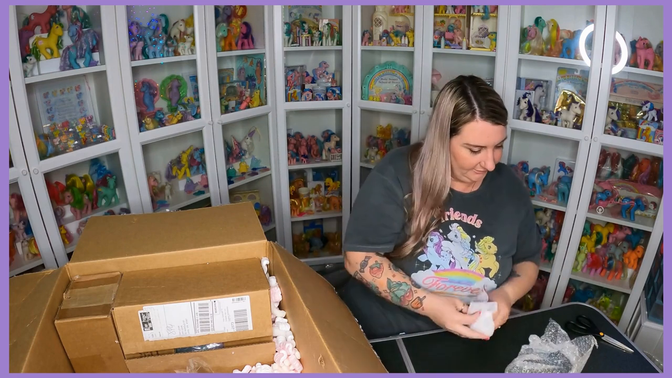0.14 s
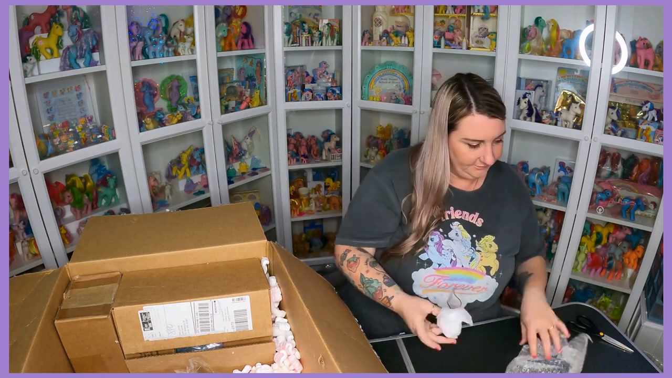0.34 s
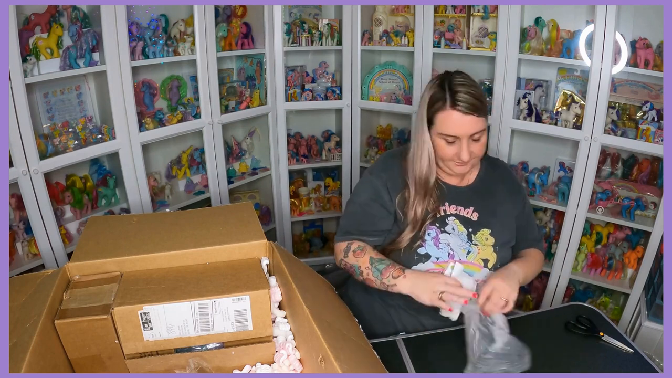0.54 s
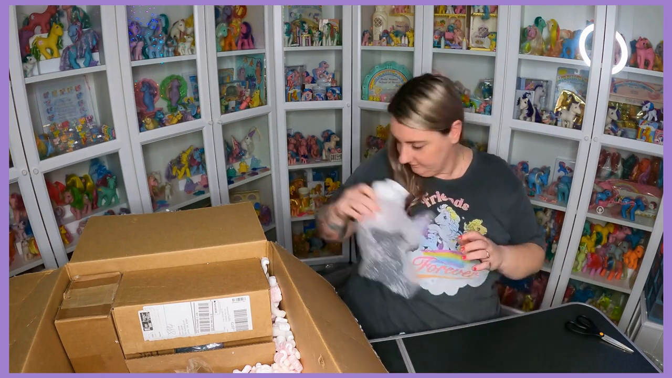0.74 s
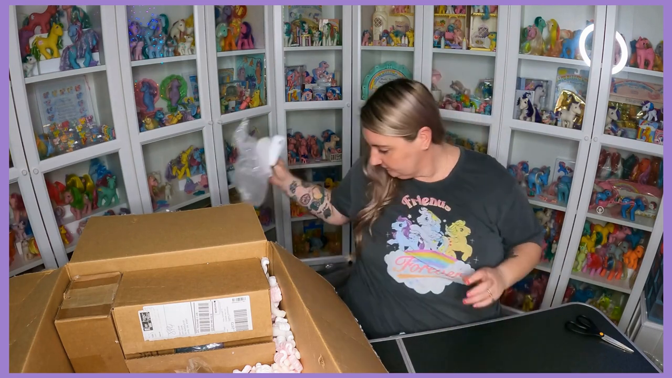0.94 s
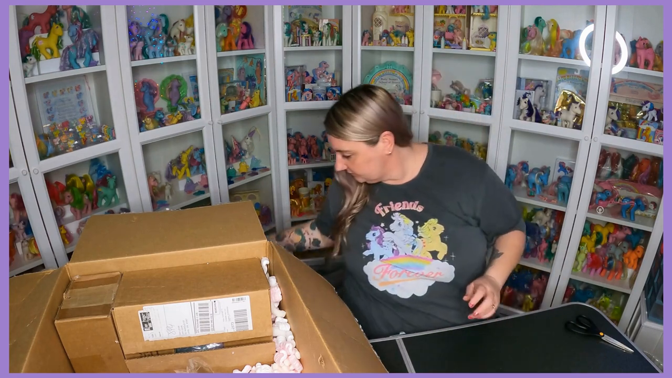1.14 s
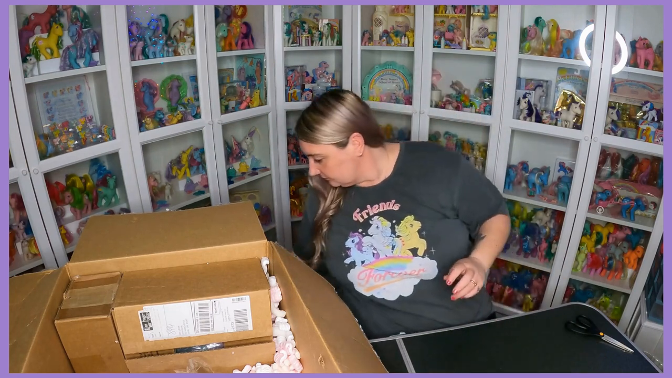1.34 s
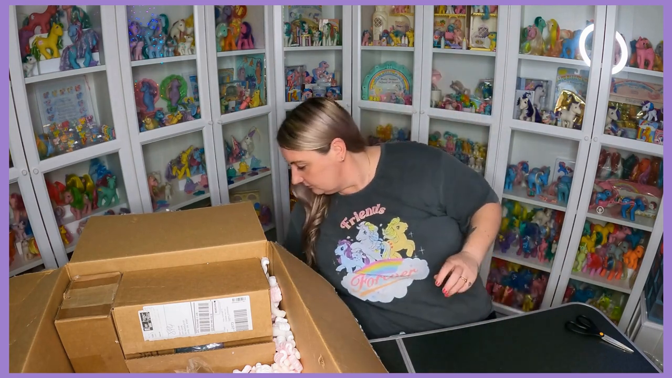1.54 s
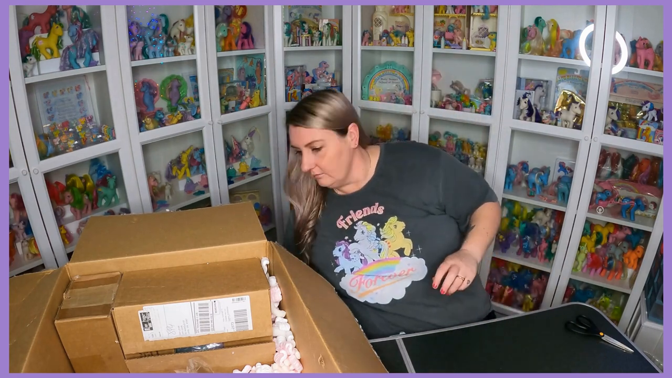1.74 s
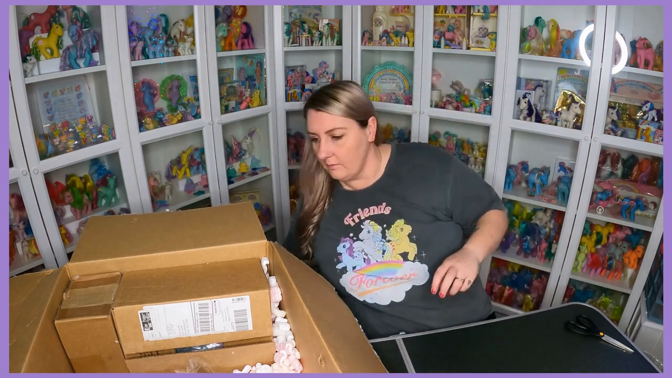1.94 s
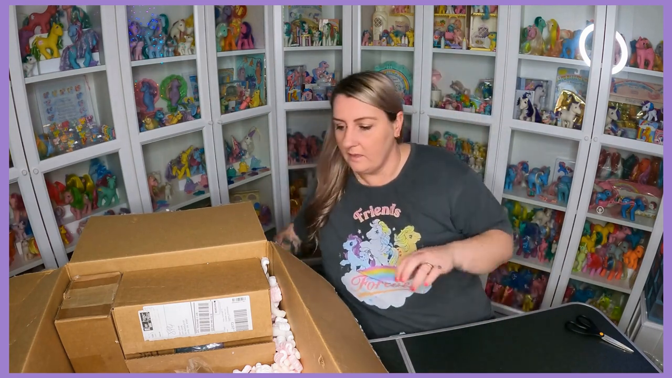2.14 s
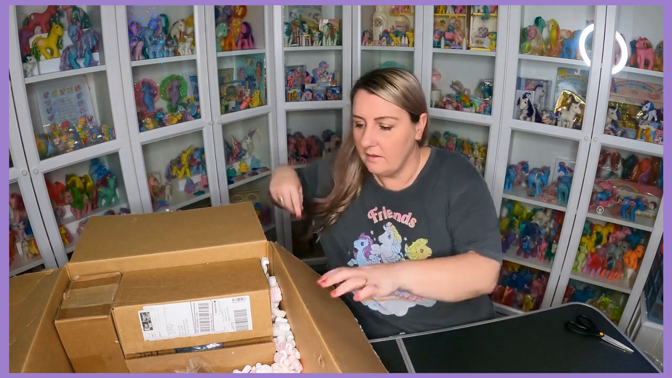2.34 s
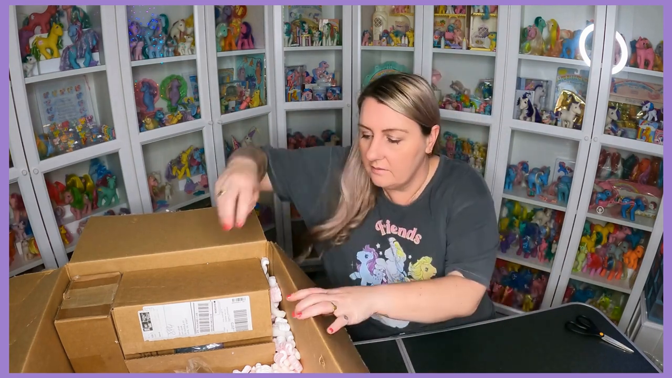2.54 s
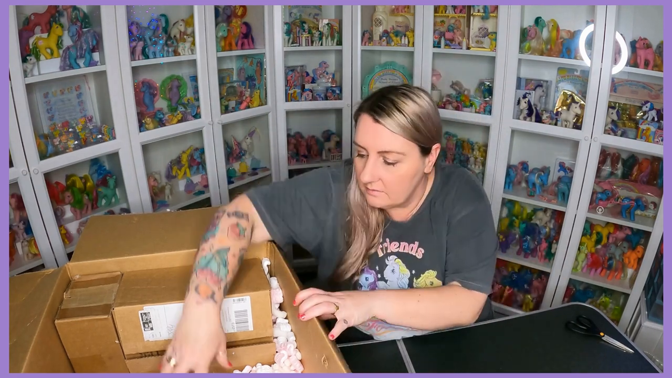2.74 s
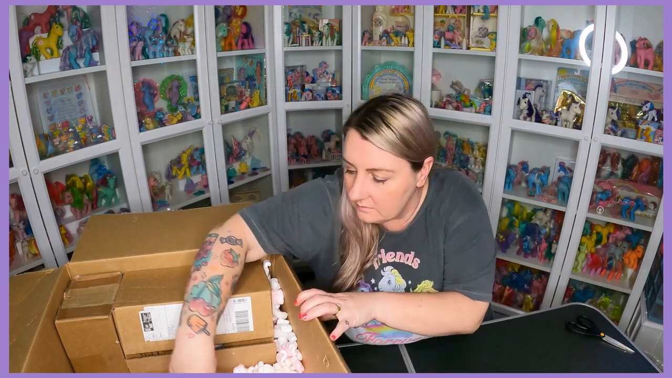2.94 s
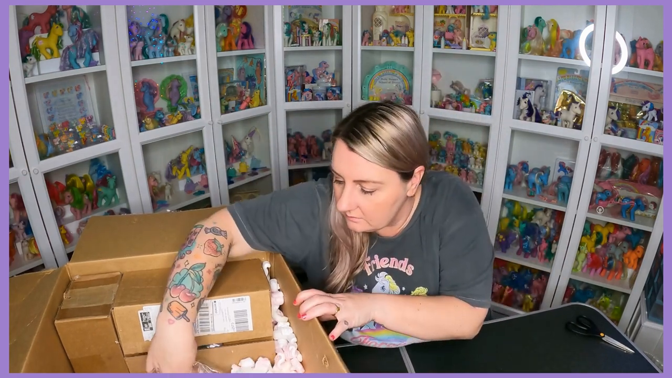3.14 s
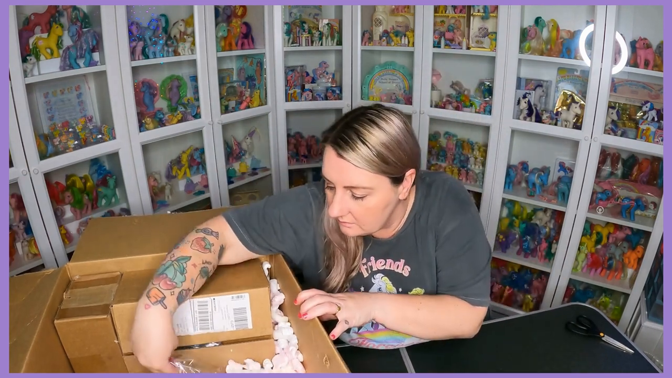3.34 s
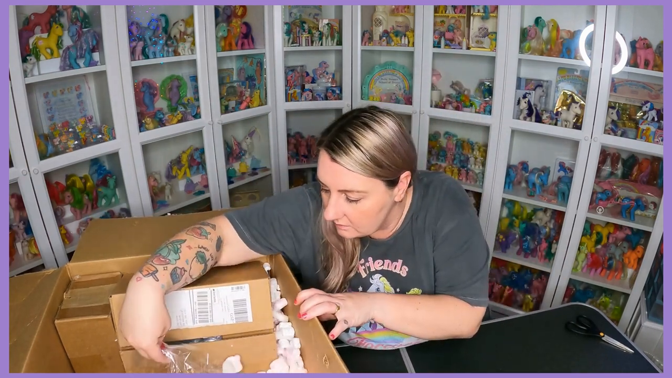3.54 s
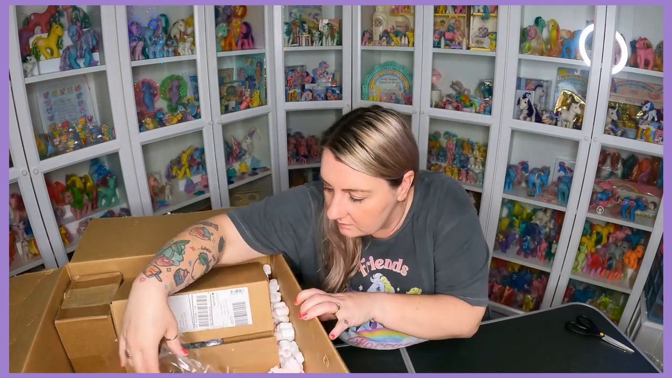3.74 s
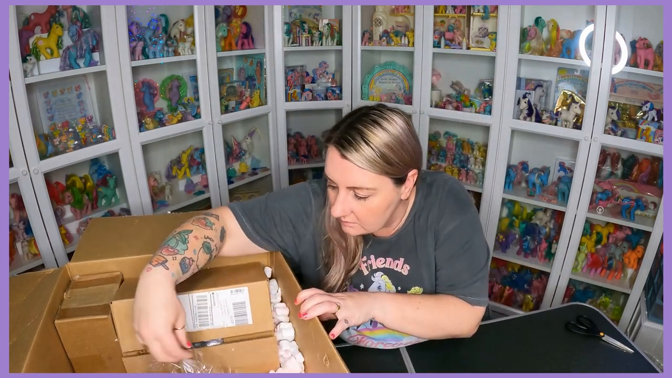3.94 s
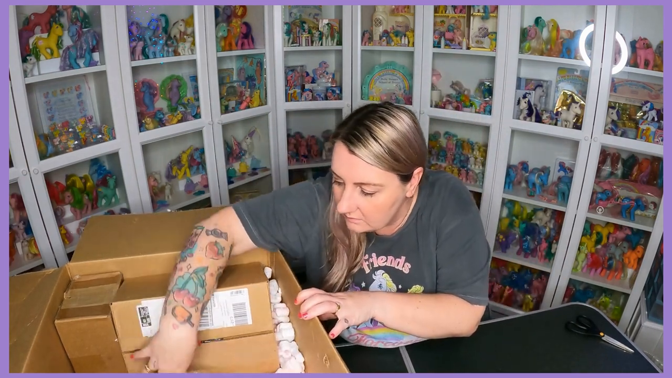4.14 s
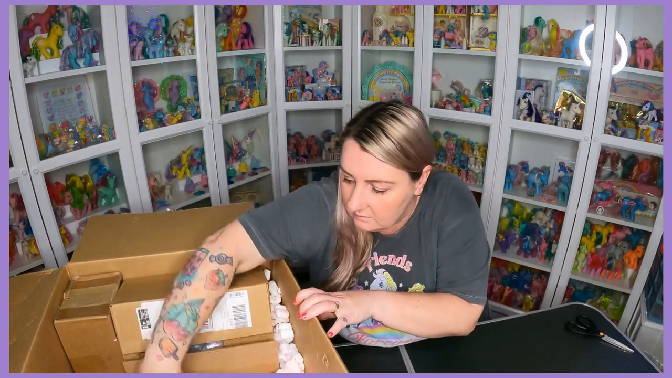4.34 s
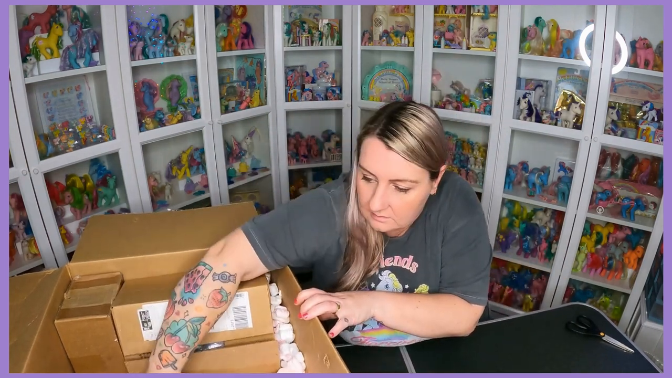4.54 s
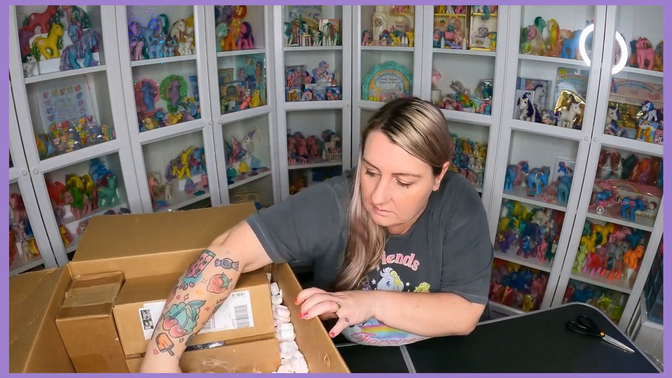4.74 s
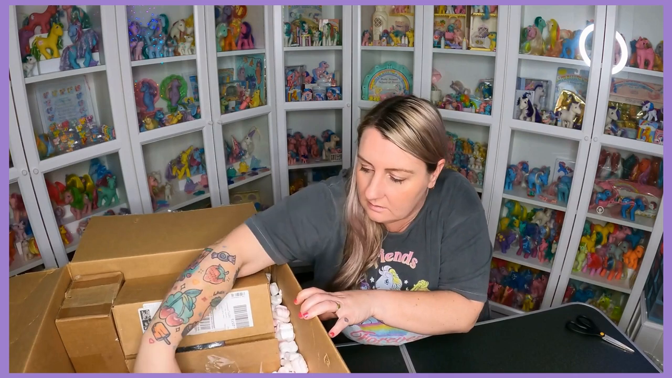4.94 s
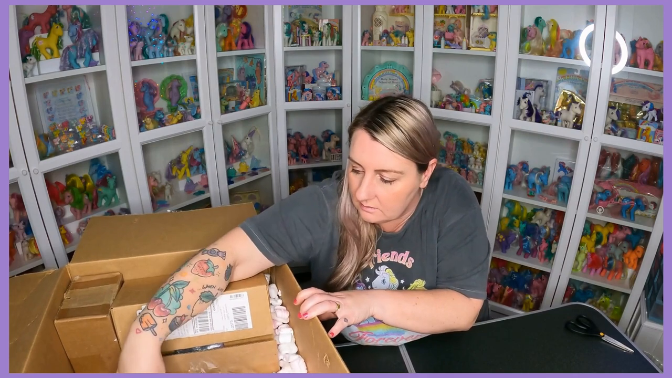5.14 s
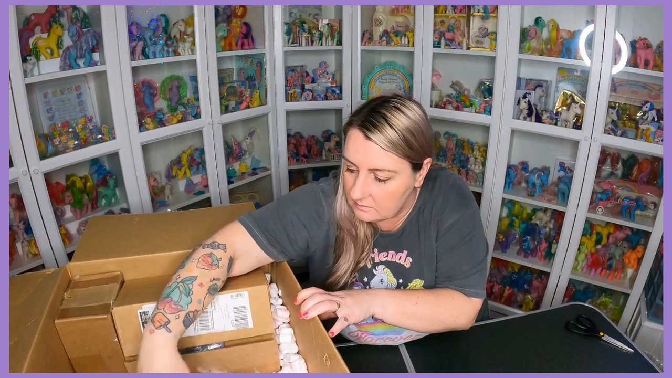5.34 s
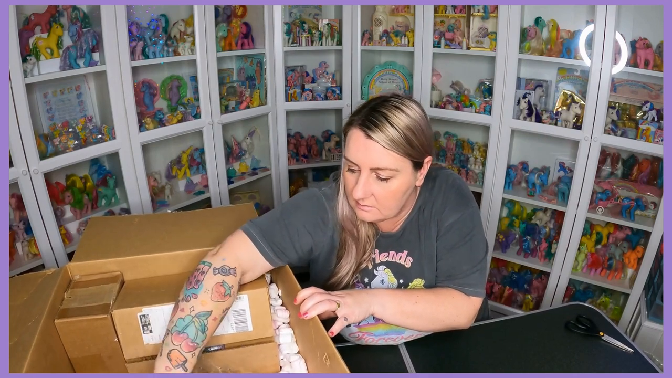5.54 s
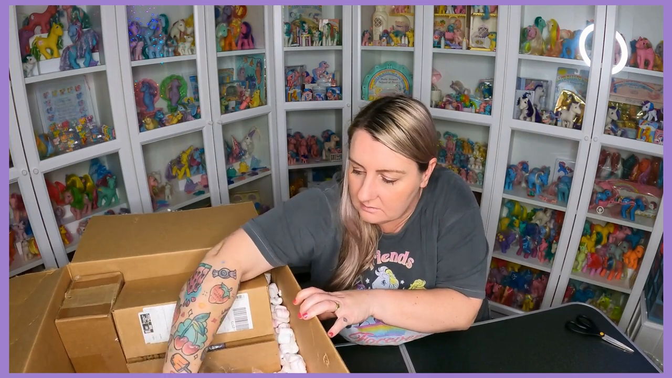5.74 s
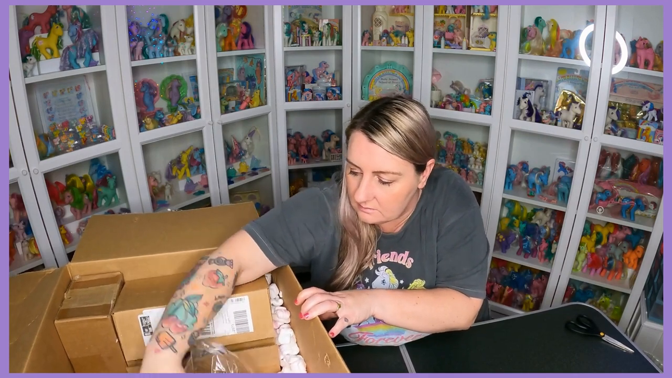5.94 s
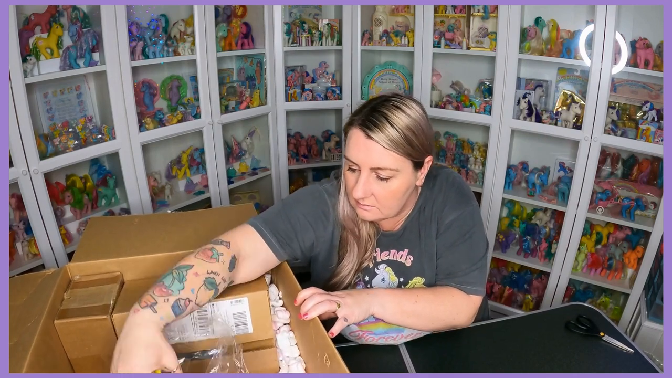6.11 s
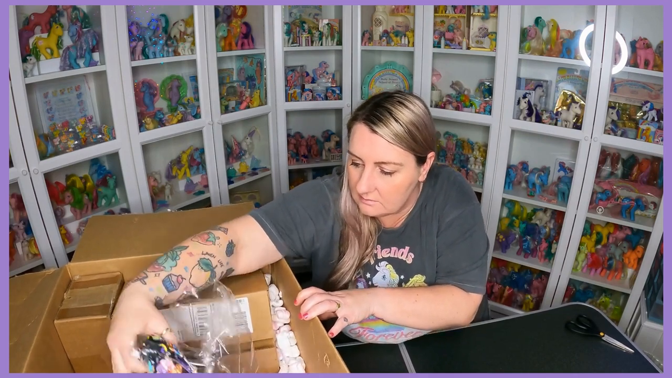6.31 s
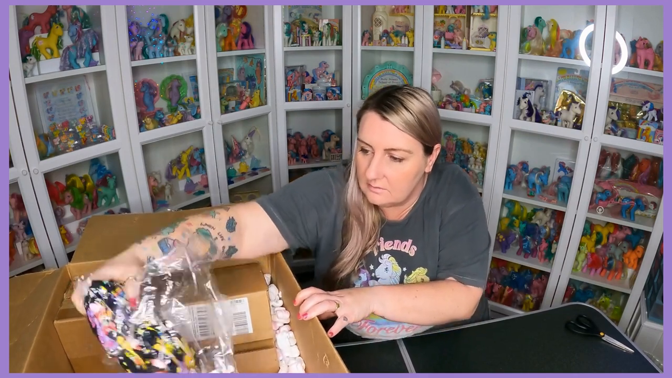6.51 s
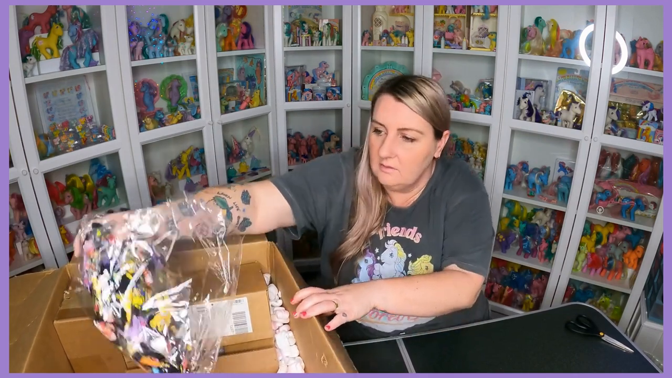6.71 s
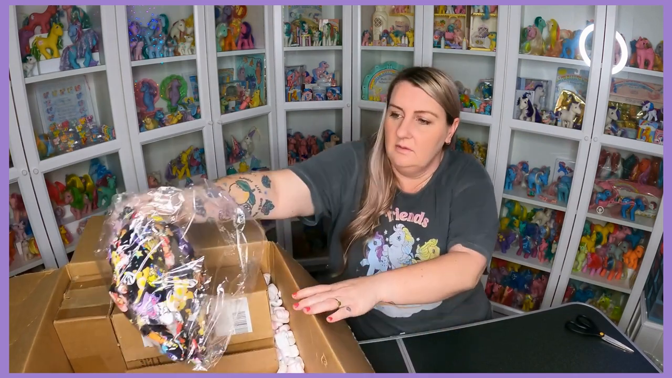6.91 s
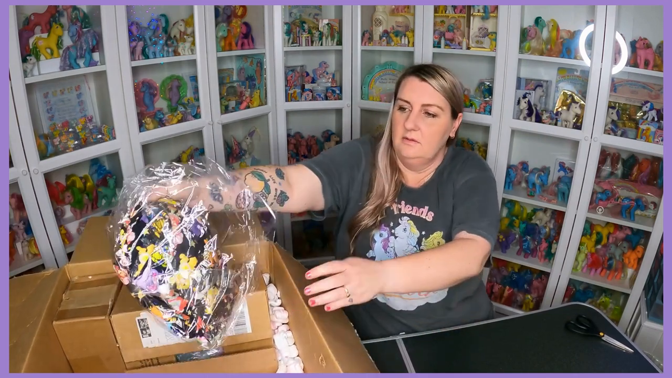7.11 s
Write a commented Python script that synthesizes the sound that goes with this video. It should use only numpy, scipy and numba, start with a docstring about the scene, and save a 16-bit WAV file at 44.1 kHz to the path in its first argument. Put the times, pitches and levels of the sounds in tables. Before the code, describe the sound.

Close stereo sound in a small furnished room, short echo, faint steady hiss. From 0 to 1 s, thin plastic wrap is gathered in light, dry crinkles, with a fuller rustle around 0.5-0.8 s, and fades as it is carried away. At about 1.5 s it lands with a hollow cardboard knock, a weaker tap following at 1.8 s. Quiet scuffs lead to a tiny hard click at 2.3 s and faint bumps around 2.6 s. At 3 s a hand digs in: loud, bright plastic crackle with foam peanuts rubbing cardboard, brief squeaks at 3.3, 3.7 and 4.1 s. From 4.2 s the rummaging comes in dense surges with dull box bumps, sharp snaps and foam chirps near 5 s. The peak, at 5.8-6 s, is a cluster of hard snaps, cardboard rattle and a low thump. Afterwards lighter film crinkles continue, with crisp snaps near 7 s.

```python
"""Digging through a box of packing peanuts

A hand gathers thin wrap, drops it, then digs through foam peanuts and plastic bags in a cardboard box.
Showers of short damped grains make the creases, foam rubs and taps; single damped swings make bumps and squeaks.
The box walls drum, and their thumps and shaking come through the table.
A small, furnished room echoes the near sounds, over a faint hiss."""
import sys
import numpy as np
from scipy import signal
from scipy.fft import rfft, irfft, next_fast_len
from scipy.io import wavfile
from numba import njit

SR = 44100
rng = np.random.default_rng(int(sys.argv[2]) if len(sys.argv) > 2 else 0)


def invert_db(level):
    """Linear amplitude ratio for a level in decibels (20 dB per decade), elementwise."""
    return 10 ** (np.asarray(level, dtype=float) / 20)


def to_wav(sig):
    """Store sig (one row per channel, or 1-D mono) as 16-bit WAV at the path in sys.argv[1].

    Samples outside -1..1 are clipped; the rate is SR.
    """
    pcm = np.clip(np.atleast_2d(sig), -1, 1) * 32767
    pcm = np.round(pcm).astype(np.int16)
    wavfile.write(sys.argv[1], SR, pcm.T)  # frames by channels


N = 316197  # length in samples


def level(x, db):
    """Scale to an rms level in dB."""
    return x * invert_db(db) / np.sqrt(np.mean(x ** 2))


def tint(x, table):
    """Filter a sound by a gain curve of (Hz, dB) points, joined along log frequency."""
    hz, db = np.transpose(table)
    size = next_fast_len(N)
    bins = np.arange(size // 2 + 1) * SR / size + 1
    gain = invert_db(np.interp(np.log(bins), np.log(hz), db))
    return irfft(rfft(x, size) * gain, size)[..., :N]


def wander(knots, per_s):
    """Join random knots into a slowly moving line, at so many knots per second."""
    return np.interp(np.arange(N) / SR * per_s, np.arange(len(knots)), knots)


def curves(table):
    """Columns of a table, joined sample by sample."""
    s, *columns = np.transpose(table)
    return [np.interp(np.arange(N) / SR, s, c) for c in columns]


@njit
def ring(length, start, pole, left, right):
    """Each grain is a damped oscillation that runs until it has faded."""
    out = np.zeros((2, length))
    for k in range(len(start)):
        z, i = 1 + 0j, start[k]
        while i < length and z.real ** 2 + z.imag ** 2 > 1e-5:
            out[0, i] += left[k] * z.imag
            out[1, i] += right[k] * z.imag
            z *= pole[k]
            i += 1
    return out


def grains(s, hz, t60, gain, pan_db):
    """Damped oscillations at given times, pitches, decays and places."""
    s, hz, t60, gain, pan_db = (v.ravel() for v in np.broadcast_arrays(s, hz, t60, gain, pan_db))
    turn = 2j * np.pi * np.clip(hz, 10, .45 * SR)
    decay = np.log(1000) / np.maximum(t60, 1e-4)
    pole = np.exp((turn - decay) / SR)
    start = np.clip(s * SR, 0, N).astype(np.int64)
    return ring(N, start, pole, gain * invert_db(pan_db / 2), gain * invert_db(-pan_db / 2))


def rings(table):
    """One damped swing for each event: the first columns are seconds, dB, Hz and t60."""
    s, db, hz, t60 = np.array(table).T[:4]
    return grains(s, hz, t60, invert_db(db), 0)


def crackle(count, low_hz, top_hz, cycles, scatter_db, spread_db):
    """A flat-coloured shower of short grains, some larger than most, each from its own spot."""
    when, pitch, big, spot, sign = rng.random((count, 5)).T
    hz = low_hz * (top_hz / low_hz) ** pitch
    size = invert_db(scatter_db * np.minimum(-np.log(1 - big), 4.0))
    # equal energy per hertz needs amplitude rising with pitch
    gain = np.sign(sign - .5) * hz * size
    return grains(when * N / SR, hz, cycles / hz, gain, spread_db * (2 * spot - 1))


def volleys(table, count, settle, octaves, start_db, fade_db):
    """Pops scattered around each event's centre pitch, thinning and fading as the sheet settles."""
    s, db, centre_hz = np.array(table).T[:, :, None]
    late, pitch, sign, spot = np.moveaxis(rng.random((len(table), count, 4)), 2, 0)
    late = late ** 1.8  # crowds the pops towards the start
    hz = centre_hz * 2 ** (octaves * (2 * pitch - 1))
    gain = np.sign(sign - .5) * invert_db(db + start_db - fade_db * late)
    return grains(s + settle * late, hz, 7.96 / hz, gain, 12.0 * (spot - .5))


# Colour of the background hiss. Each row: frequency in Hz, relative density in dB per Hz.
HISS_COLOUR = [(35, -47), (60, -27), (210, -1.5), (642, -16), (1020, -12), (5320, -13.5), (12300, -27),
               (15500, -31)]


def hiss():
    """Steady noise, partly shared by both channels."""
    noise = rng.standard_normal(N) + .5 * rng.standard_normal((2, N))
    return level(tint(noise, HISS_COLOUR), -57.5)


@njit
def walls(x, lags, gain, damp):
    """Eight delay lines that feed each other, duller on every round."""
    line, soft, out = np.zeros((8, 4096)), np.zeros(8), np.zeros((2, len(x)))
    for i in range(len(x)):
        total = 0.
        for k in range(8):
            soft[k] += (1 - damp) * (gain[k] * line[k, (i - lags[k]) & 4095] - soft[k])
            total += soft[k]
            out[k % 2, i] += soft[k] * (1 - (k & 2))
        for k in range(8):
            line[k, i & 4095] = x[i] + soft[k] - total / 4
    return out


def room(near):
    """Echo of a small, furnished room, whose treble dies sooner than its bass."""
    t60_s, damp, echo_db = 0.46, 0.28, -18.5
    lags = np.array([211, 307, 419, 557, 683, 827, 991, 1171])  # samples
    return invert_db(echo_db) * walls(near.mean(0), lags, invert_db(-60 * lags / SR / t60_s), damp)


# The table rocks once. Each row: start in seconds, level in dB, pitch in Hz, t60 in seconds.
TABLE_SWAY = [(2.612, -39.5, 24, 0.49)]


def sway():
    """A slow damped swing of the table."""
    return rings(TABLE_SWAY)


# Colour of the shaking. Each row: frequency in Hz, relative density in dB per Hz.
SHAKE_COLOUR = [(20, -25), (50, 4.5), (100, -2), (160, 10.5), (300, -20)]


def shake():
    """Low jolts of the box come through the table as long, deep grains."""
    jolts = crackle(count=1500, low_hz=13.6, top_hz=246.0, cycles=14.5, scatter_db=1.5, spread_db=7.5)
    return level(tint(jolts, SHAKE_COLOUR), 0)


# Dull bumps of the box. Each row: start in seconds, level in dB, pitch in Hz, t60 in seconds,
# level in dB of the shaking around it.
BOX_BUMPS = [(0.466, -30, 169, 0.16, -52), (1.053, -39, 217, 0.14, -53), (1.54, -38, 252, 0.07, -67),
             (2.562, -46, 53.3, 0.078, -58), (2.945, -36, 280, 0.17, -59), (4.239, -23, 310, 0.04, -43),
             (4.376, -20, 283, 0.04, -47), (4.669, -20, 155, 0.037, -43), (4.671, -22, 570, 0.048, -60),
             (5.526, -33.5, 266, 0.12, -62), (5.878, -18.5, 282, 0.047, -36),
             (5.915, -16.5, 328, 0.028, -40), (5.922, -17, 136, 0.09, -29), (5.982, -16.5, 88, 0.15, -34),
             (5.986, -15, 173, 0.081, -45), (7.052, -28, 214, 0.062, -44)]


def bumps():
    """Each bump is one damped swing of the box."""
    return rings(BOX_BUMPS)


# Knocks on cardboard. Each row: start in seconds, level in dB.
CARD_KNOCKS = [(1.438, -30), (1.539, -9.5), (1.71, -31), (1.781, -20.5), (2.561, -34.5), (5.91, -20),
               (5.978, -11.5)]
# Modes of the cardboard. Each row: pitch in Hz, relative level in dB, t60 in seconds.
CARD_MODES = [(336, -13, 0.13), (415, -15, 0.088), (640, -16, 0.051), (888, -9, 0.082), (1115, -6, 0.059),
              (1298, -14.5, 0.15), (1565, -8, 0.032), (2410, -3, 0.0055)]


def knocks():
    """A blow and its rattling rebounds ring the same cardboard modes, each with a new balance."""
    s, db = np.array(CARD_KNOCKS).T[:, :, None, None]
    hz, mode_db, t60 = np.array(CARD_MODES).T
    draws = rng.random((len(CARD_KNOCKS), 16, len(CARD_MODES), 3))
    late, tilt, bend = np.moveaxis(draws, 3, 0)
    late = late ** 2.2  # crowds the rebounds towards the blow
    gain = invert_db(db + mode_db - 11 - 18 * late + 4 * (tilt - .5))
    bent_hz = hz * (1 + 0.206 * (bend - .5))
    return grains(s + 0.09 * late, bent_hz, t60, gain, 0)


# Colour of the scuffing. Each row: frequency in Hz, relative density in dB per Hz.
SCUFF_COLOUR = [(120, -12), (200, 0), (400, -2.5), (900, -2.5), (1500, -7.5), (3000, -7.5)]


def scuff():
    """Foam beads and fingers rub and tap the cardboard."""
    taps = crackle(count=12000, low_hz=131.4, top_hz=2406.0, cycles=28.0, scatter_db=2.0, spread_db=8.0)
    return level(tint(taps, SCUFF_COLOUR), 0)


# A small hard object. Each row: start in seconds, level in dB, pitch in Hz, t60 in seconds.
HARD_CLINK = [(2.3168, -28, 3900, .03), (2.3168, -27, 6400, .02), (2.3168, -27, 7600, .025),
              (2.325, -43, 1230, 0.2), (2.334, -33, 1310, 0.022)]


def clink():
    """A small hard object clicks and rings in a few damped modes."""
    return rings(HARD_CLINK)


# Short pitched chirps of foam and small parts. Each row: start in seconds, level in dB, pitch in Hz.
FOAM_CHIRPS = [(3.3124, -16, 2900), (3.71, -13.5, 2560), (4.0977, -17.5, 1670), (4.9102, -9.5, 2730),
               (4.9712, -13, 2480), (4.971, -12, 4080), (5.078, -13, 2800)]


def chirps():
    """Squeaks that all last the same number of swings, so high ones are shorter."""
    swings = 18  # until faded by 60 dB
    return rings([(s, db, hz, swings / hz) for s, db, hz in FOAM_CHIRPS])


def patchy(sheet):
    """Large and small folds give way at different moments, so each band's level flickers alone."""
    depth_db, knots_per_s = 1.5, 55
    lows = [signal.sosfilt(signal.butter(2, hz, fs=SR, output="sos"), sheet) for hz in (1500, 3000, 5500)]
    bands = np.diff([0 * sheet, *lows, sheet], axis=0)
    knots = rng.standard_normal((len(bands), 1000))
    return sum(band * invert_db(depth_db * wander(k, knots_per_s)) for band, k in zip(bands, knots))


# Colour of the film. Each row: frequency in Hz, relative density in dB per Hz.
FILM_COLOUR = [(410, -53), (700, -47), (931, -4.5), (1540, -3.5), (3320, -2.5), (3970, 0), (7500, -3.5),
               (8500, -10.5), (10900, -16.5), (12300, -17.5), (15500, -27.5)]


def film(air_db, crisp_db):
    """Creases of film pop over the slide of sheet on sheet, with lone ticks and squeaks of foam."""
    pops = crackle(count=30000, low_hz=636.0, top_hz=15750.0, cycles=21.0, scatter_db=0.5, spread_db=9.5)
    slide = rng.standard_normal(N) + 0.2 * rng.standard_normal((2, N))
    when, big, pitch = rng.random((1500, 3)).T
    scattered = np.transpose([when * N / SR, -3.2 * np.log(1.03 - big), 2200 * 3.0 ** pitch])
    ticks = volleys(scattered, count=10, settle=.0025, octaves=.8, start_db=0, fade_db=6)
    squeaks = crackle(count=700, low_hz=1000.0, top_hz=9000.0, cycles=40.0, scatter_db=3.0, spread_db=7.5)
    lone = level(level(ticks, 0) + level(squeaks, -3), 0)
    mix = level(pops, 0) + level(slide, -4) + lone * invert_db(crisp_db)
    sheet = level(tint(mix, FILM_COLOUR), 0)
    # stiffer film is brighter
    air = signal.sosfilt(signal.butter(2, 7000, "high", fs=SR, output="sos"), sheet)
    return patchy(sheet + (invert_db(air_db) - 1) * air)


# Loud single snaps. Each row: start in seconds, level in dB, centre pitch in Hz.
CREASE_SNAPS = [(1.5405, -19.5, 2950), (2.3165, -18.5, 9000), (2.7535, -27, 4000), (1.7805, -22, 3800),
                (2.9808, -12, 5860), (3.0143, -13, 7560), (3.3732, -11, 4530), (4.0188, -26.5, 5540),
                (4.2503, -9.5, 4000), (4.3929, -12, 6400), (4.5439, -18, 4020), (4.81, -12, 2420),
                (5.0885, -11.5, 6500), (5.1992, -9, 3770), (5.5023, -16.5, 5830), (5.7854, -7, 4570),
                (6.15, -13, 4000), (6.192, -21, 5500), (6.225, -18, 4500), (6.315, -16, 4800),
                (2.606, -30.5, 5500), (5.9097, -6, 3100), (5.9215, -4.5, 5230), (5.9534, -10, 2800),
                (5.9787, -3.5, 2340), (6.4837, -14, 4800), (6.9636, -11.5, 2200), (7.044, -14, 4500)]
# Crumples, a patch of film giving way at once. Each row: start in seconds, level in dB.
FILM_CRUMPLES = [(0.28, -22.5), (3.033, -8), (3.136, -9), (4.182, -13), (4.208, -12.5), (4.411, -10.5),
                 (5.156, -17), (5.188, -12), (5.444, -17), (5.528, -8.5), (5.632, -13), (5.667, -14),
                 (5.704, -7), (5.855, -9.5), (6.29, -23), (6.462, -19), (6.527, -18), (6.697, -18),
                 (7.09, -28)]
# Colour of all creases. Each row: frequency in Hz, gain in dB.
CREASE_COLOUR = [(150, -46), (600, -5), (1500, -12.5), (6500, 0.5), (8500, -1), (15500, -3.5)]


def creases():
    """Creases snap in milliseconds, patches crumple longer; each move opens with a grab that rustles out."""
    crumple_hz, grab_hz, octaves = 4080, 4850, 1.1
    grab_per_fade = 0.62  # a grab is stronger where its move then fades
    snap = volleys(CREASE_SNAPS, count=24, settle=.004, octaves=.65, start_db=-4, fade_db=8)
    s, db = np.transpose(FILM_CRUMPLES)
    patches = np.transpose([s, db, crumple_hz + 0 * s])
    crumple = volleys(patches, count=90, settle=0.017, octaves=octaves, start_db=-5, fade_db=4)
    s, _, db, change_db, _ = np.transpose(HAND_MOVES)
    grabs = np.transpose([s, db - grab_per_fade * change_db, grab_hz + 0 * s])
    grab = volleys(grabs, count=400, settle=0.1, octaves=octaves, start_db=-12.0, fade_db=14)
    return tint(snap + crumple + grab, CREASE_COLOUR)


def envelope(start, length, db, change_db, rise, fall):
    """Overlapping gains: each rises up to its start, drifts over its length and falls; powers add."""
    since = np.arange(0, N + 32, 32)[:, None] / SR - start  # seconds, every 32 samples
    drift = change_db * np.clip(since / length, 0, 1)
    edges = rise * np.minimum(since, 0) - fall * np.maximum(since - length, 0)
    gain = np.sqrt(np.sum(invert_db(db + drift + edges) ** 2, 1))
    return np.interp(np.arange(N) / 32, np.arange(len(since)), gain)


# Moves of the hand. Each row: start in seconds, length in seconds, film crinkle in dB at the start,
# crinkle change in dB over the move, starting level of the scuffing in dB against the crinkle.
HAND_MOVES = [(0.0, 0.14, -45, -5, -15.5), (0.188, 0.24, -37, -7, -12.5), (0.471, 0.24, -30, -12.5, -13),
              (0.712, 0.31, -30.5, -21.5, -11.5), (0.999, 0.48, -43.5, -7.5, -33),
              (1.059, 0.045, -37.5, 2, -6.5), (1.365, 0.079, -38.5, 7.5, -6.5), (1.472, 0.26, -41.5, -3, 4),
              (1.781, 0.11, -33.5, -19.5, -1), (1.924, 0.31, -47, -9, 5.5), (2.321, 0.1, -41, -36, -21),
              (2.606, 0.058, -42, -6, -3), (2.71, 0.057, -46, 2.5, 0.5), (2.75, 0.2, -49, -3, 0),
              (2.958, 0.065, -30, 0.5, -6.5), (3.054, 0.2, -22, -6, -7.5), (3.344, 0.34, -27.5, 1, -6.5),
              (3.717, 0.11, -41.5, 6, -11), (3.818, 0.07, -27, 3, -8.5), (4.07, 0.072, -32, 7.5, -13.5),
              (4.191, 0.15, -23, -6, -10.5), (4.383, .11, -25.5, -6.5, -8.5),
              (4.527, 0.11, -32.5, -6, -6.5), (4.638, 0.2, -27.5, 4.5, -8), (4.877, 0.27, -27, -2, -11),
              (5.146, 0.16, -25, -9.5, -6.5), (5.305, 0.2, -27.5, -9.5, -5), (5.522, 0.37, -25.5, 0.8, -8),
              (5.912, 0.25, -25, -12, -2.5), (6.123, 0.15, -29, -11, -6), (6.263, 0.16, -31.5, -12, -8),
              (6.43, 0.3, -34.5, 3, -9.5), (6.65, 0.19, -32, -2.5, -9.5), (6.829, 0.061, -24.5, -11, -11.5),
              (6.895, 0.21, -27.5, -4, -10), (7.061, 0.048, -26.5, -2, -6.5)]


def effort():
    """Gains of crinkle, scuffing and shaking, all following the hand; bumps shake the table harder."""
    attack, scuff_attack, release = 1494, 545, 222  # dB per second
    jolt_rise, jolt_fall = 500, 173  # dB per second
    scuff_contrast = 1.39  # cardboard changes more over a move
    shake_db = -17.5  # against scuffing
    flutter_db, flutter_per_s = 0.74, 22  # creases give way in clusters
    s, length, db, change_db, scuff_db = np.transpose(HAND_MOVES)
    length = np.maximum(length, .01)
    crinkle = envelope(s, length, db, change_db, attack, release)
    rub = envelope(s, length, db + scuff_db, scuff_contrast * change_db, scuff_attack, release)
    bump_s, _, _, t60, jolt_db = np.transpose(BOX_BUMPS)
    jolt = envelope(bump_s, t60 / 2, jolt_db, 0, jolt_rise, jolt_fall)
    knots = rng.standard_normal((2, 1000))
    film_db, foam_db = (flutter_db * wander(k, flutter_per_s) for k in knots)
    return crinkle * invert_db(film_db), rub * invert_db(foam_db), np.hypot(invert_db(shake_db) * rub, jolt)


# Place and character of the near sounds. Each row: time in seconds, left minus right in dB,
# film gain in the treble in dB, lone ticks and squeaks in dB against the pops.
NEAR_PLACE = [(0.0, -1.5, 2.5, -8.5), (0.84, 0, -2, -10.5), (1.06, 2.5, 4.5, -6), (2.1, 3.5, -4, -4),
              (2.74, 0.5, 1, -7), (2.95, 1.5, 4.5, -7.5), (4.53, 2, 3.5, -8), (5.9, 2, 3.5, -7),
              (6.25, 2.5, 5.5, -2.5), (7.17, 2.5, -1.5, -6)]


def scene():
    """Near sources, their echo in the room, table-borne bass and hiss."""
    crinkle, rub, tremble = effort()
    pan_db, air_db, crisp_db = curves(NEAR_PLACE)
    near = film(air_db, crisp_db) * crinkle + scuff() * rub
    near = near + creases() + knocks() + chirps() + clink()
    # the near sounds carry no deep bass
    near = signal.sosfilt(signal.butter(2, 140, "high", fs=SR, output="sos"), near)
    near = near * invert_db(np.array([pan_db, -pan_db]) / 2)
    through_table = shake() * tremble + bumps() + sway()
    return near + room(near) + through_table + hiss()


# Stereo width. Each row: frequency in Hz, gain of the side signal in dB.
STEREO_WIDTH = [(100, -3.5), (300, -10), (700, -1), (5000, 2), (9000, 2), (14000, 8.5)]


def capsules(dry):
    """Two capsules close together: the low end is narrowed and the treble widened."""
    mid, side = dry.mean(0), tint((dry[0] - dry[1]) / 2, STEREO_WIDTH)
    return np.array([mid + side, mid - side])


def top_cut(x):
    """Nothing passes above the cut-off."""
    return signal.sosfilt(signal.butter(12, 15600, fs=SR, output="sos"), x)


def record(dry):
    """Pick up the scene with the pair of capsules and pass that mix to the last stage."""
    mix = capsules(dry)
    return top_cut(mix)


dry = scene()
out = record(dry)
to_wav(out)
```